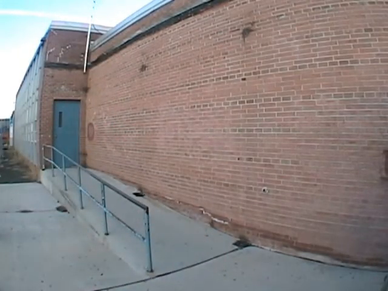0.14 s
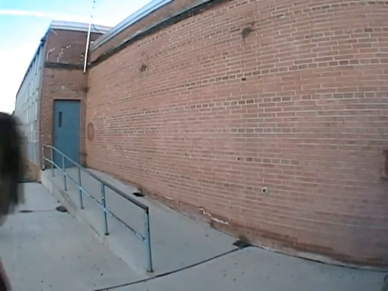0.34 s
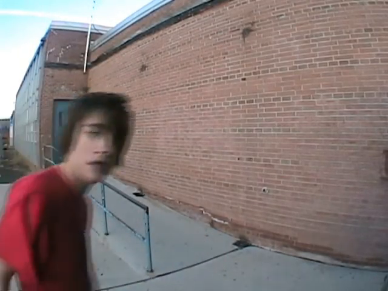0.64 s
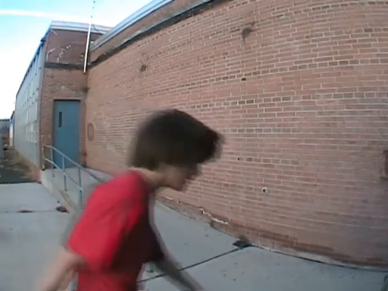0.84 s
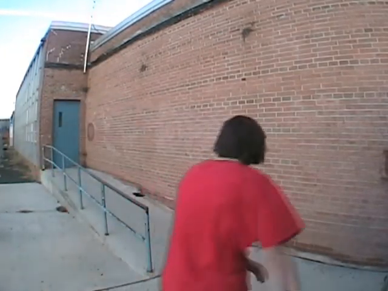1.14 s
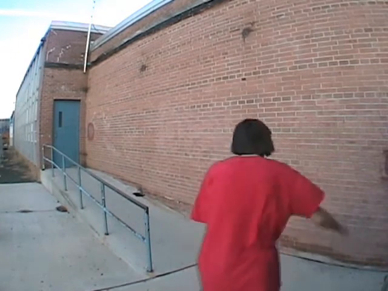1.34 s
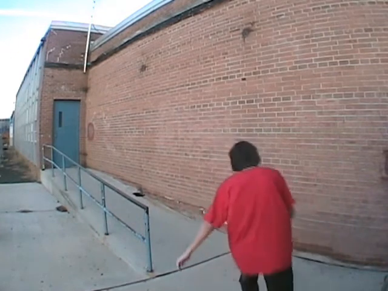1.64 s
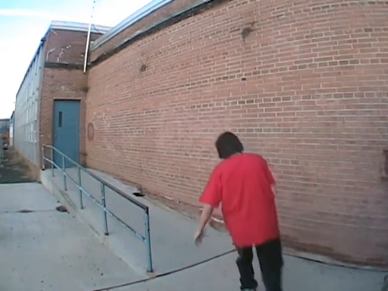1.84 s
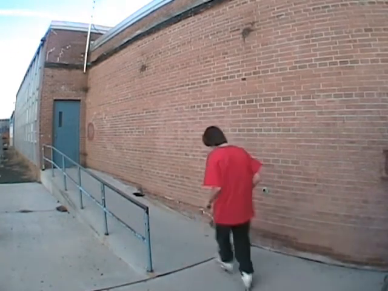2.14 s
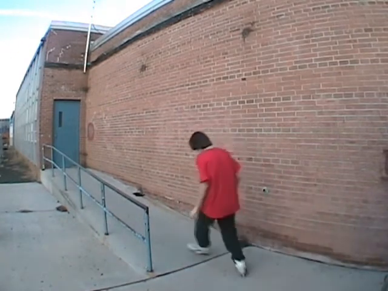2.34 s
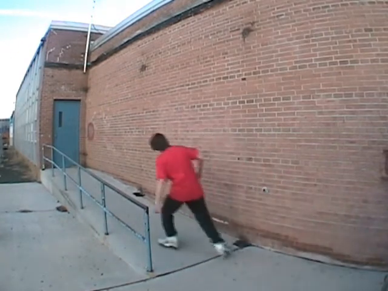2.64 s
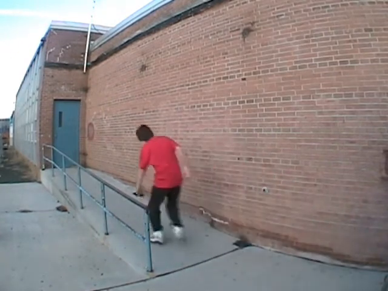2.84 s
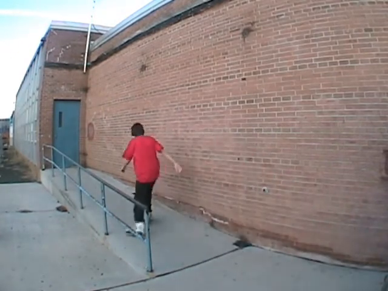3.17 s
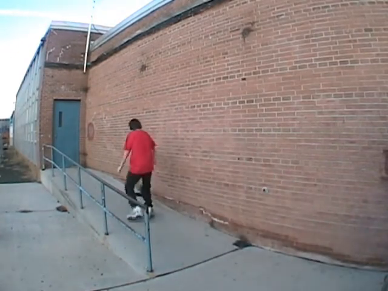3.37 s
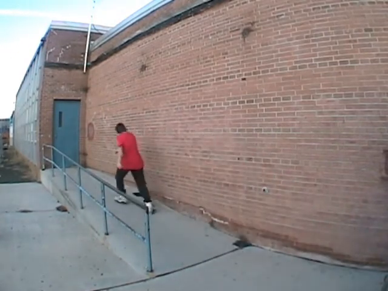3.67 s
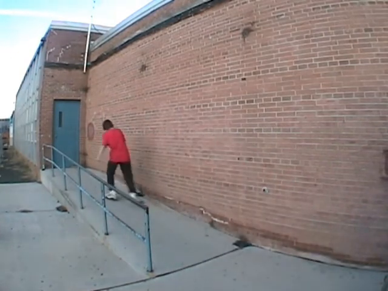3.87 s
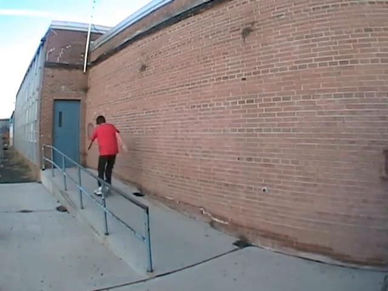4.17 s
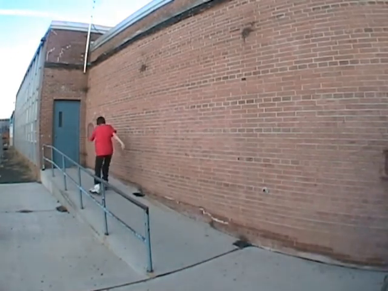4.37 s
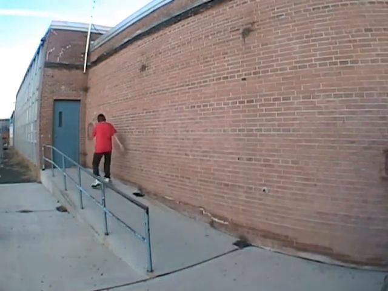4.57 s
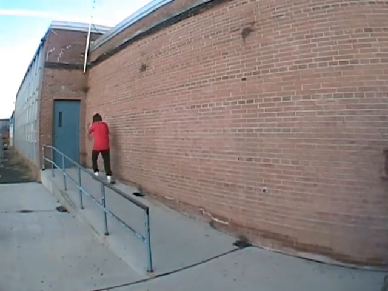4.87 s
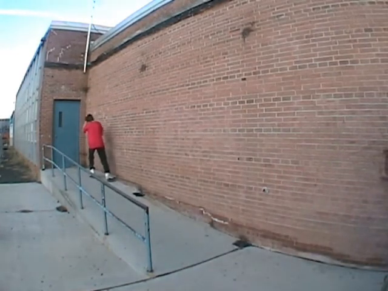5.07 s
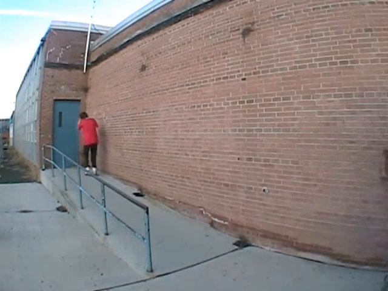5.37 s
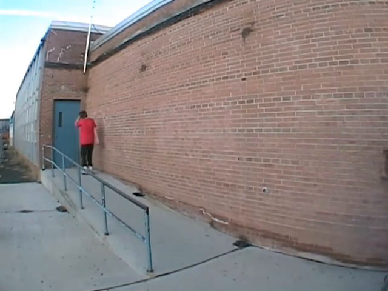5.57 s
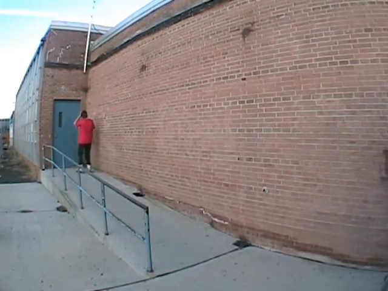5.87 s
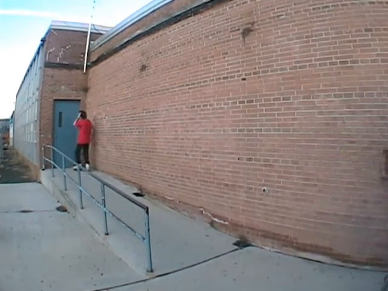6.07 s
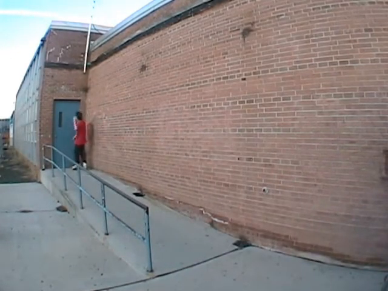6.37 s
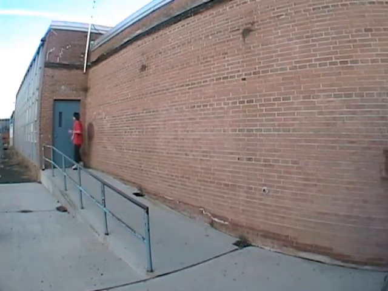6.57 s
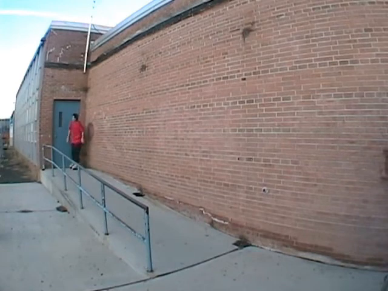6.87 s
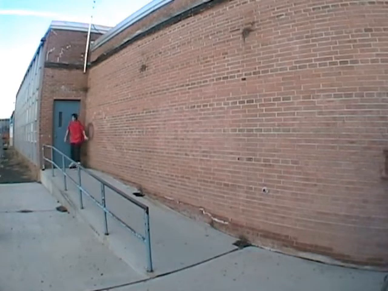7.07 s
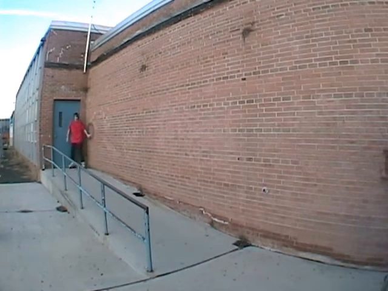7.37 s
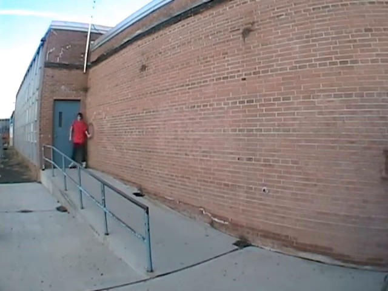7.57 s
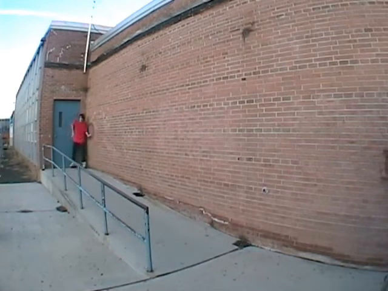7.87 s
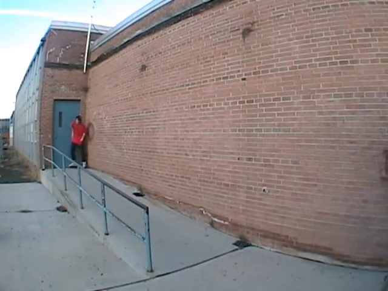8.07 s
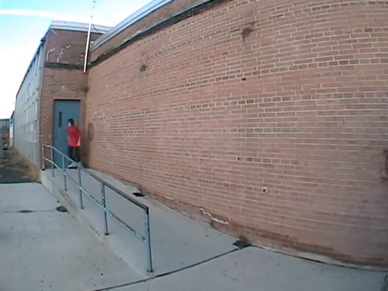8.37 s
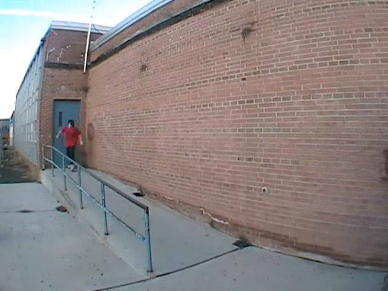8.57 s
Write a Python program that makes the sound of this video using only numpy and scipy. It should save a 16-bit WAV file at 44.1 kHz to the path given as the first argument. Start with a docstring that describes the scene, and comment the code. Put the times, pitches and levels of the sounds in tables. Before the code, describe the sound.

Coasting skate wheels hum past with a brief singing bearing, followed by hard plastic knocks and gritty scrapes receding up a concrete ramp outdoors.

```python
"""Coasting skate wheels hum and whirr past at once, with a bearing singing; then a skater stamps up a concrete ramp.
Each set-down rings boot, wheel, plastic shell and frame through resonators fed by an impact and chattering grains.
Between them the wheels grind: patchy grains drive the same resonances, crushed sand and cracking stones on top.
A brick wall answers by convolution with a slap and decaying noise.
Underneath: shaped-noise rumble and hiss, a low drone, and the faint wavering tones of a camera mechanism."""
import sys
import numpy as np
from scipy import signal
from scipy.fft import rfft, irfft, next_fast_len
from scipy.io import wavfile

SR = 44100
rng = np.random.default_rng(int(sys.argv[2]) if len(sys.argv) > 2 else 0)


def transcribe(u):
    """Save the signal u as a 16-bit wav file named by the first command-line argument.

    u: samples, shape (n,) or (channels, n), limited to [-1, 1]; the rate is SR.
    q: integer samples, one column per channel.
    """
    v = np.clip(np.atleast_2d(u).T, -1, 1)
    q = np.round(v * 32767).astype(np.int16)
    wavfile.write(sys.argv[1], SR, q)


N = 384111


def from_db(db):
    """Decibels to amplitude gain."""
    return 10 ** (np.asarray(db) / 20)


def rms_one(x):
    """Scale to unit rms."""
    return x / np.sqrt(np.mean(x ** 2) + 1e-20)


def in_time(rows):
    """Interpolate each column of a (t/s, ...) table to every sample."""
    s, *columns = np.transpose(rows)
    return [np.interp(np.arange(N) / SR, s, c) for c in columns]


def butter(x, hz, kind, order=2):
    """Causal Butterworth high- or low-pass."""
    sos = signal.butter(order, min(hz, SR / 2 - 2000), kind, fs=SR, output="sos")
    return signal.sosfilt(sos, x)


def band(x, low_hz, high_hz, order=2):
    """High-pass, then low-pass of the given order."""
    return butter(butter(x, low_hz, "high"), high_hz, "low", order=order)


def coloured(x, spectrum):
    """Filter by (f/Hz, gain/dB) points, interpolated over log frequency."""
    hz, db = np.transpose(spectrum)
    size = next_fast_len(N)
    bins = np.maximum(np.fft.rfftfreq(size, 1 / SR), 1)
    gain = from_db(np.interp(np.log(bins), np.log(hz), db))
    return irfft(rfft(x, size) * gain, size)[:N]


def drift(per_s, count=N):
    """Random curve of unit rms with per_s new values a second."""
    i = np.arange(count)
    return rms_one(np.interp(i / SR * per_s, i, rng.standard_normal(count)))


def wavering_sine(hz):
    """Sine of peak sqrt(2), hence unit rms, following a pitch curve."""
    return np.sqrt(2) * np.sin(2 * np.pi * np.cumsum(hz) / SR)


def resonate(x, modes, detune=1, spread_db=0):
    """Parallel two-pole resonances with alternating signs; spread_db varies their strengths."""
    out = 0
    for k, (hz, width_hz, db) in enumerate(modes):
        r = np.exp(-np.pi * width_hz / SR)
        poles = [1, -2 * r * np.cos(2 * np.pi * hz * detune / SR), r * r]
        gain = (-1) ** k * from_db(db + spread_db * rng.standard_normal()) * (1 - r * r) / 2
        out = out + gain * signal.lfilter([1, 0, -1], poles, x + 1e-18)
    return out


def grains(per_s, size_db, count):
    """Random single-sample contacts of either sign, a few much larger than the rest."""
    sizes = from_db(size_db * np.minimum(rng.exponential(1, count), 4))
    return sizes * rng.choice([-1, 1], count) * (rng.random(count) < per_s / SR)


def favour(hz, ring_hz, width):
    """Nearness of a mode to the favoured pitch, 0-1; width in log frequency."""
    return np.exp(-(np.log(hz / ring_hz) / width) ** 2)


# partials of the camera mechanism: f/Hz, level/dB
WHINE_PARTIALS = [(3136, -66), (4931, -70), (5385, -75), (5925, -81), (6180, -71), (6374, -69.5),
                  (7144, -83), (8166, -82)]


def whine():
    """Mechanism whine: sines that waver in pitch and level."""
    out = 0
    for hz, db in WHINE_PARTIALS:
        level = from_db(db + 2 * drift(40))
        out = out + level * wavering_sine(hz + 17 * drift(90))
    return out


# level of the distant drone: t/s, level/dB
DRONE_LEVEL = [(0, -59), (3.4, -49.5), (4.1, -44), (5.2, -44.5), (6.2, -44), (7, -54), (8.7, -45)]
DRONE_HZ, DRONE_WIDTH_HZ = 128.3, 29


def drone():
    """Distant low drone: noise through two equal resonances in series."""
    mode = [(DRONE_HZ, DRONE_WIDTH_HZ, 0)]
    noise = resonate(resonate(rng.standard_normal(N), mode), mode)
    return from_db(in_time(DRONE_LEVEL)[0]) * rms_one(noise)


# relative spectra of distant rumble and of hiss: f/Hz, level/dB
RUMBLE_SPECTRUM = [(15, -73), (25, -24), (60, -8), (119, -1.1), (152, -5), (189, -1.5), (210, -5.5),
                   (234, -3.5), (329, -8), (356, -2.5), (384, -10.5), (492, -12), (583, -15.5), (610, -17),
                   (757, -25), (1000, -17), (1300, -62), (2200, -120)]
HISS_SPECTRUM = [(590, -5), (1000, 0.5), (1180, 1), (1390, -1), (2550, -12), (3190, -13), (4240, -20.5),
                 (5820, -18), (6310, -27), (7130, -25), (8480, -21.5), (10300, -24.5), (11400, -28),
                 (14800, -83), (22000, -120)]
# swell of the rumble: t/s, level/dB
RUMBLE_SWELL = [(0, -2.5), (1, -0.5), (2, 0.5), (3, -1), (4, 0.5), (5, 0), (6, 1.5), (7, 0.5), (8, -0.5),
                (8.7, 1.5)]
RUMBLE_DB, HISS_DB = -38, -47


def air():
    """Wavering rumble plus steady hiss, both shaped noise."""
    rumble = rms_one(coloured(rng.standard_normal(N), RUMBLE_SPECTRUM))
    rumble_db = RUMBLE_DB + in_time(RUMBLE_SWELL)[0] + 1.0 * drift(8.0)
    hiss = rms_one(coloured(rng.standard_normal(N), HISS_SPECTRUM))
    return rumble * from_db(rumble_db) + hiss * from_db(HISS_DB)


# air sound of opposite sign at the two ports, against the shared air: f/Hz, level/dB
UNSHARED_AIR = [(30, -18), (60, -21), (120, -34), (250, -16), (600, -2.5), (1200, -3), (4000, -10),
                (10000, -25)]


def background():
    """Air, whine and drone at both microphone ports; a second air signal enters with opposite signs."""
    unshared = coloured(air(), UNSHARED_AIR) * [[1], [-1]]
    return air() + unshared + whine() + drone()


# drive of the wall reflections: t/s, level/dB
WALL_DRIVE = [(0, -13.5), (2.5, -16.5), (4, -15.5), (6, -13), (8.7, -18)]
YARD_T60_S, TAIL_T60_S = 0.13, 0.5


def yard(x):
    """Wall slap, quick scatter and fainter long tail: convolution with noise partly unique to each port."""
    t = np.arange(SR // 2) / SR
    decay = from_db(-60 * t / YARD_T60_S) + from_db(-6) * from_db(-60 * t / TAIL_T60_S)
    scatter = rng.standard_normal(len(t)) + .7 * rng.standard_normal((2, len(t)))
    response = butter(scatter * decay * (t > .004), 7700, "low", order=1)
    response /= np.sqrt(np.sum(response ** 2) / 2)
    response[:, round(.018 * SR)] += .35   # slap
    response = butter(response, 500, "high", order=1)
    drive = x[None] * from_db(in_time(WALL_DRIVE)[0])
    return signal.fftconvolve(drive, response, axes=1)[:, :N]


# singing bearing: t/s, f/Hz, level/dB
BEARING_SING = [(.44, 3950, -66), (.51, 3990, -46.5), (.58, 4040, -46), (.66, 3950, -49.5),
                (.73, 3860, -53), (.83, 3760, -72)]
SING_WIDTH_HZ = 150


def bearing():
    """Bearing swish that bends up and sinks again: a gliding sine multiplied by low-passed noise."""
    hz, db = in_time(BEARING_SING)
    flutter = rms_one(butter(rng.standard_normal(N), SING_WIDTH_HZ / 2, "low"))
    return from_db(db) * flutter * wavering_sine(hz)


# resonances of coasting wheels and spinning bearings: f/Hz, width/Hz, level/dB
COASTING_MODES = [(240, 120, -3), (341, 33, 1), (390, 33, 6), (544, 130, 2), (913, 140, -1),
                  (1440, 200, -1), (1780, 190, -3), (2200, 580, -8.5)]
BEARING_MODES = [(2960, 1130, 7.5), (3770, 310, 11), (4860, 3500, -4.5), (6500, 530, -0.5),
                 (8800, 2000, -11)]
# relative spectrum of crushed sand: f/Hz, level/dB
GRIT_SPECTRUM = [(500, -11), (900, 12), (2400, 3), (3200, -2), (4700, -2), (6000, -8), (7500, -7.5),
                 (9200, -6), (11000, -29)]
PASS_S, PASS_DISTANCE_M, SPEED_M_PER_S = 0.55, 0.28, 2.26
LIFT_S, LIFT_FADE_S = 0.83, 0.1   # the coasting skate leaves the ground
HUM_DB, WHIRR_DB, GLIDE_GRIT_DB = -32.5, -41.5, -45.5   # at the closest point
WHEEL_TONE_HZ, WHEEL_TONE_DB = 403.4, -43.5


def glide():
    """Coasting: grains ring wheels and bearings with 1/distance gain; tone and swish join in until the lift."""
    t = np.arange(N) / SR
    nearness = PASS_DISTANCE_M / np.hypot(PASS_DISTANCE_M, SPEED_M_PER_S * (t - PASS_S))
    grounded = np.clip(1 - (t - LIFT_S) / LIFT_FADE_S, 0, 1)
    ground = grains(per_s=9000, size_db=3.5, count=N) * from_db(0.12 * drift(35))
    hum = from_db(HUM_DB) * rms_one(resonate(ground, COASTING_MODES))
    whirr = from_db(WHIRR_DB) * rms_one(resonate(ground, BEARING_MODES))
    stray = grains(per_s=260, size_db=3.0, count=N)
    grit = from_db(GLIDE_GRIT_DB) * rms_one(coloured(stray, GRIT_SPECTRUM))
    tone_gain = from_db(WHEEL_TONE_DB + 2 * drift(18))
    tone = tone_gain * wavering_sine(WHEEL_TONE_HZ + 3 * drift(25))
    return grounded * (nearness * (hum + whirr + grit) + tone + bearing())


# resonances of the boot: f/Hz, width/Hz, level/dB
BOOT_MODES = [(234.6, 130, -3.5), (306, 113, 2.5), (405, 110, -5.5)]
# skate rolling or shuffling on concrete: start t/s, length/s,
# grinding level/dB, rumble level/dB (before BOOT_TRIM_DB), grit level/dB, rumble f/Hz
ROLLING_STROKES = [(0.92, 0.6, -40, -35, -43.5, 382), (1.607, 0.61, -34, -31.5, -40.5, 280),
                   (1.665, .09, -46, -28, -41.5, 300), (2.1, 0.21, -39.5, -37, -38.5, 300),
                   (2.298, 0.45, -40, -37.5, -39.5, 374), (2.736, 0.42, -46.5, -42.5, -57, 333),
                   (3.123, 0.15, -45, -34.5, -43, 302), (3.315, 0.69, -45.5, -40, -51, 342),
                   (3.954, .48, -49.5, -44, -54.5, 332), (4.42, 0.43, -52, -62, -54, 330),
                   (4.778, 0.2, -43, -66, -54.5, 330), (4.974, 0.17, -39.5, -43, -48, 330),
                   (5.2, 0.43, -53.5, -60, -55.5, 330), (5.51, 0.31, -45, -50, -52, 330),
                   (5.513, 0.043, -40, -38, -46, 400), (5.81, 0.2, -41, -46, -55, 356),
                   (6.07, 0.56, -47.5, -53, -56, 330), (6.422, 0.11, -46, -48, -48, 250),
                   (6.65, 0.71, -51.5, -48, -77, 300), (7.583, .062, -54, -61, -53, 330),
                   (7.805, .055, -47, -59, -49.5, 330), (8.305, .029, -46, -33.5, -56, 264)]
STROKE_ATTACK_S, STROKE_RELEASE_S, STROKE_SAG_DB_PER_S = 0.04, 0.049, 2.5
RUMBLE_RING_DB = 6   # how far a stroke favours boot modes near its pitch


def stroke_gains():
    """Strokes take weight, sag as the skate slows and die away; power-summed gains: grind, grit, boot modes."""
    power = np.zeros((2 + len(BOOT_MODES), N))
    boot_hz = np.array(BOOT_MODES)[:, 0]
    for start_s, length_s, grind_db, rumble_db, grit_db, rumble_hz in ROLLING_STROKES:
        at = round(start_s * SR)
        t = np.arange(min(SR, N - at)) / SR
        attack = np.minimum(t / STROKE_ATTACK_S, 1)
        release = np.exp(-np.maximum(t - length_s, 0) / STROKE_RELEASE_S)
        shape = attack * from_db(-STROKE_SAG_DB_PER_S * t) * release
        shares = from_db(RUMBLE_RING_DB * favour(boot_hz, rumble_hz, width=0.22))
        boot_gains = from_db(rumble_db) * shares / np.linalg.norm(shares)
        gains = [from_db(grind_db), from_db(grit_db), *boot_gains]
        power[:, at:at + len(t)] += np.outer(gains, shape) ** 2
    return np.sqrt(power)


# resonances of the shell and of a struck wheel: f/Hz, width/Hz, level/dB
SHELL_MODES = [(950, 46, -33), (1066, 70, -1.5), (1290, 225, 1), (1554, 226, 2), (1716, 257, 1.5),
               (1990, 367, 2.5), (2164, 240, 1.5), (2870, 28, -21)]
WHEEL_MODES = [(483, 165, -9), (602, 39, 2), (860, 123, -4)]
SNAPS_PER_S, SNAP_SHARE = 400, 0.68   # breaking bits of grit; strength against sand
STONE_WIDTH_SHARE = .35   # ring width / pitch
LEAN_DB, LEAN_PER_S = 1.3, 14   # as the skate leans, each shell mode comes and goes
BOOT_TRIM_DB, WHEEL_SHARE_DB = 1.0, -21


def grit_snaps():
    """Bits of grit snap: sparse grains ring eight broad resonances."""
    pitches_hz = np.geomspace(1900, 8000, 8)
    out = 0
    for hz in pitches_hz:
        bits = grains(per_s=SNAPS_PER_S / len(pitches_hz), size_db=3.0, count=N)
        out = out + resonate(bits, [(hz, STONE_WIDTH_SHARE * hz, 0)]) / np.sqrt(hz)
    return rms_one(out)


def rolling():
    """Concrete grain drums unevenly on the wheels, exciting boot, wheel and shell; sand crackles, grit snaps."""
    grind_gain, grit_gain, *boot_gains = stroke_gains()
    # smooth rolling turns to jerky shuffling
    jerk_db = np.interp(np.arange(N) / SR, [2.8, 4.5], [2.2, 2.9])
    patches = from_db(jerk_db * np.minimum(drift(220), 1.6))
    ground = rms_one(grains(per_s=6000, size_db=2.0, count=N) * patches)
    sand = rms_one(grains(per_s=5000, size_db=3.0, count=N) * patches)
    boot = 0
    for k, (mode, gain) in enumerate(zip(BOOT_MODES, boot_gains)):
        boot = boot + (-1) ** k * gain * rms_one(resonate(ground, [mode]))
    wheel_gain = from_db(WHEEL_SHARE_DB) * np.linalg.norm(boot_gains, axis=0)
    wheel = wheel_gain * rms_one(resonate(ground, WHEEL_MODES))
    grind = 0
    for k, mode in enumerate(SHELL_MODES):
        lean = from_db(LEAN_DB * drift(LEAN_PER_S))
        grind = grind + (-1) ** k * lean * resonate(ground, [mode])
    grit = rms_one(coloured(sand + SNAP_SHARE * grit_snaps(), GRIT_SPECTRUM))
    return from_db(BOOT_TRIM_DB) * boot + wheel + grind_gain * rms_one(grind) + grit_gain * grit


# single stones cracking under a wheel: t/s, level/dB (rms of first 1/700 s), f/Hz
STONE_CRACKS = [(1.0677, -39, 4080), (1.1274, -49, 3750), (1.156, -41, 3640), (1.1837, -42, 4890),
                (1.2221, -43, 3680), (1.2612, -34.5, 4700), (1.488, -37, 4600), (1.4987, -44, 4480),
                (1.6053, -44, 3990), (1.6771, -39, 3920), (1.8076, -35.5, 3660), (1.834, -37, 4050),
                (1.9054, -38, 3640), (1.953, -44, 4180), (2.115, -24, 4110), (2.348, -39, 4550),
                (2.687, -38, 3560), (2.713, -34, 3910), (2.803, -38.5, 3400), (3.053, -41, 3470),
                (3.1847, -39, 4660), (3.231, -41, 4800), (3.684, -43, 3430), (3.8306, -39, 3650),
                (3.925, -41, 3520), (4.882, -45, 6500), (4.947, -42, 3460), (5.1014, -46, 4900),
                (5.1078, -43, 4600), (5.5428, -45, 4600), (5.6346, -43, 4500), (6.514, -43, 4880),
                (7.224, -39, 4520), (7.633, -42, 4930), (7.76, -46, 3420), (8.1628, -28, 3080)]
STONE_CRUMBLE_S = .0009   # decay time constant of the burst


def stones():
    """A stone bursts under a wheel: decaying noise rings one broad resonance and the shell."""
    t = np.arange(SR // 40) / SR
    out = np.zeros(N + len(t))
    for s, db, hz in STONE_CRACKS:
        burst = rng.standard_normal(len(t)) * np.exp(-t / STONE_CRUMBLE_S)
        tick = resonate(burst, [(hz, STONE_WIDTH_SHARE * hz, 0)])
        tick = tick + 0.11 * band(burst, 2300, 8700) + 0.98 * resonate(burst, SHELL_MODES)
        at = round(s * SR)
        out[at:at + len(t)] += from_db(db) * tick / np.sqrt(np.mean(tick[:SR // 700] ** 2))
    return out[:N]


# resonances of the frame that holds the wheels: f/Hz, width/Hz, level/dB
FRAME_MODES = [(2846, 276, 6.5), (3650, 460, 3), (4050, 230, -3.5), (4530, 240, 5), (4900, 1400, -1),
               (5730, 410, -6), (5850, 2500, -18.5), (6570, 490, -4), (7600, 1700, -6.5),
               (8600, 5400, -10.5)]
# lower and upper edge of the thump, as ratios to its pitch
THUMP_EDGES = (.62, 1.45)
# set-downs: t/s, boot thump level/dB, shell clack level/dB, frame tick level/dB (rms of first 20 ms),
# thump f/Hz, favoured shell ring f/Hz, tick tilt/(dB/octave), scuff/s
SET_DOWNS = [(.039, -45, -35.5, -42, 330, 2200, -4, 0.012),
             (.269, -46, -35.5, -37.5, 330, 1290, -10, .0018), (.297, -48, -39, -43, 330, 1500, -14, .005),
             (.903, -36, -23.5, -35.5, 366, 1670, 4, 0.0011), (.908, -38, -32, -50, 370, 1660, -4, 0.00098),
             (.920, -30, -38, -41, 373, 1780, 0, .0014), (.952, -20.5, -23.5, -31, 322, 1400, 0.5, 0.0024),
             (.963, -44, -46, -38, 312, 2000, 3, 0.0025), (1.431, -60, -38.5, -42.5, 330, 1610, 4, .00086),
             (1.574, -40, -35.5, -42, 375, 1330, -3, 0.013), (1.643, -26, -47, -41, 320, 1310, 0, 0.0052),
             (2.087, -28, -22, -32, 302, 1970, 3, .002), (2.094, -28, -28, -32, 297, 2200, 1, 0.003),
             (2.102, -11.5, -18, -20, 292, 1270, 3, 0.0019),
             (2.109, -28, -16.5, -26, 386, 1980, -12, 0.0023), (2.115, -34, -29, -33, 330, 1300, 8, .001),
             (2.147, -35, -34, -46, 290, 1300, -7, .002), (2.189, -33, -31, -45, 373, 2000, -13, 0.0016),
             (2.558, -33.5, -27, -44, 377, 2200, 5, 0.0036),
             (2.633, -16.5, -21.5, -35.5, 331, 1950, 8, .0022),
             (3.207, -28, -30, -38, 287, 1440, -7, .0035),
             (3.214, -23.5, -23.5, -39, 258, 1390, -1, 0.0034), (3.226, -38, -38, -40, 343, 1780, 2, .004),
             (3.243, -39, -36, -49, 267, 1500, -10, 0.0063),
             (3.491, -37, -32.5, -37, 408, 1580, 6.5, .0048),
             (3.558, -35.5, -30.5, -43, 364, 1450, 5.5, 0.003),
             (3.790, -28, -28, -57, 356, 1570, -6, .0009), (3.797, -45, -34, -46, 350, 1850, 14, 0.0048),
             (3.806, -22, -28, -35.5, 365, 1780, -3, .0026), (3.832, -38, -38, -46, 296, 2020, -18, .0042),
             (4.457, -27.5, -25, -36, 410, 1780, -3, 0.0054),
             (4.476, -40, -32.5, -40, 312, 1330, -5, .0052), (4.719, -37.5, -35, -37, 408, 1500, 1, .0026),
             (4.739, -54, -39, -43, 370, 1760, 5, .0066), (4.820, -38.5, -33, -46, 360, 1570, 10, 0.0029),
             (4.838, -53, -51, -59, 335, 1540, 0, .0016), (5.003, -35, -37.5, -55, 230, 2010, -4, 0.0029),
             (5.021, -42, -41, -56, 330, 1990, -6, 0.0028), (5.038, -36, -49, -55, 405, 1500, -6, .0027),
             (5.087, -56, -44, -49.5, 290, 2140, 20, .0011), (5.123, -46, -37, -45, 240, 1970, -5, 0.0038),
             (5.156, -60, -49, -53, 330, 2140, 0, .0015), (5.185, -41, -29.5, -42, 271, 1410, 4, 0.0036),
             (5.296, -36, -37.5, -47.5, 288, 1440, -7, 0.0029),
             (5.410, -52, -33, -52, 420, 1380, 21, 0.0039), (5.420, -55, -35, -47, 322, 1370, -5, .0025),
             (5.431, -52, -39, -44, 270, 2030, -7, 0.0039), (5.494, -38, -24.5, -44, 315, 2040, 8, 0.0023),
             (5.500, -43, -27, -36.5, 315, 1900, -11, 0.0023),
             (5.508, -46, -29.5, -40, 285, 1690, -16, .0018),
             (5.513, -38.5, -29.5, -42, 288, 2070, -8, 0.0015),
             (5.559, -44, -32, -57, 365, 2040, -2, 0.0044), (5.570, -37, -37, -53, 417, 1780, -8, 0.002),
             (5.771, -37, -35, -41, 310, 2120, -17, 0.0036),
             (5.916, -44, -37.5, -49, 358, 1960, -16, 0.0033),
             (6.375, -33, -38.5, -48, 246, 1640, -6, 0.0061), (6.483, -49, -35, -53, 300, 1660, -5, .0025),
             (6.549, -38, -40.5, -53, 334, 1360, -5, 0.0018),
             (6.564, -58, -34.5, -44.5, 300, 1350, -4, 0.0027),
             (6.584, -53, -40, -52, 297, 2200, -3, 0.0037), (6.594, -41, -44, -55, 320, 1500, -8, 0.0023),
             (6.923, -36, -28, -41, 260, 1890, -2, 0.0022),
             (7.033, -56, -39.5, -46.5, 255, 1290, 11, 0.003), (7.111, -63, -46, -51.5, 230, 1800, 7, .004),
             (7.200, -51, -32.5, -36, 262, 1290, 11, 0.0028),
             (7.218, -49, -38, -42.5, 278, 1560, -17, 0.0083),
             (7.243, -48, -49, -48, 328, 1500, 17, 0.0048), (7.277, -60, -55, -48, 370, 1400, 29, 0.0033),
             (7.293, -52, -42, -62, 380, 1440, 0, .0026), (7.309, -47, -44, -44, 260, 1900, 9.5, .0042),
             (7.509, -31, -34.5, -45, 325, 1330, -1, 0.0042),
             (7.578, -38.5, -48, -44, 355, 1370, -12, 0.0033),
             (8.161, -43, -41.5, -45, 267, 1090, 5, 0.00068),
             (8.314, -35, -28, -41.5, 363, 1290, -10, 0.0027),
             (8.698, -30.5, -23.5, -40, 420, 1920, 2, 0.007)]
WHEEL_GIVE_S, BOTTOMING_S = 0.001602, 0.001   # wheel squash before the frame's blow; spread of that blow
WEIGHT_SETTLES_S = .005   # the boot takes up the weight
RAGGED_DB, RAGGED_PER_S = 4, 600   # unevenness of the chatter
SHELL_VARIES = .03   # relative spread of each shell mode's pitch between landings
RING_DB = 7   # how far a landing favours shell modes near its ring
BOOT_GIVES_DB, BOOT_DAMPING_OCT_PER_DB = -21, .035   # heavier thumps widen the boot modes
WHEEL_KNOCK_DB = -8.5   # against the weaker of thump and clack


def landing_forces(t, scuff_s):
    """Wheels land, squash and chatter down: chatter, force on shell, weight on boot, blow on frame."""
    impact = (t == 0) * 1.0
    settling = np.exp(-t / (2.5 * scuff_s)) + from_db(-19.0) * np.exp(-t / 0.018)   # slides on a little
    ragged = from_db(RAGGED_DB * drift(RAGGED_PER_S, count=len(t)))
    contact = (1 - np.exp(-t / (0.13 * scuff_s))) * settling * ragged
    chatter = grains(per_s=6700, size_db=1.0, count=len(t)) * contact
    chatter = rms_one(chatter) / np.sqrt(len(t))
    square = np.exp(-scuff_s / 0.0052)   # a glancing landing has little first impact
    bottoming = rng.standard_normal(len(t)) * np.exp(-((t - WHEEL_GIVE_S) / BOTTOMING_S) ** 2)
    bottoming = rms_one(bottoming) / np.sqrt(len(t))
    force = chatter + 1.31 * square * np.roll(impact, round(WHEEL_GIVE_S / 2 * SR))
    weight = chatter * np.exp(-t / WEIGHT_SETTLES_S) + 1.6 * square * impact
    blow = chatter + 1.06 * square * bottoming
    return chatter, force, weight, blow


def landing_modes(thump_db, thump_hz, ring_hz, tilt_db):
    """Boot, shell and frame modes: load damps the boot, the struck spot favours shell modes, tilt the frame's."""
    shell = []
    for hz, width_hz, db in SHELL_MODES:
        strayed_hz = hz * (1 + SHELL_VARIES * rng.standard_normal())
        shell.append((strayed_hz, width_hz, db + RING_DB * favour(hz, ring_hz, width=.09)))
    frame = [(hz, width_hz, db + tilt_db * np.log2(hz / FRAME_MODES[0][0]))
             for hz, width_hz, db in FRAME_MODES]
    load_db = max(thump_db - BOOT_GIVES_DB, 0)
    widening = 2 ** (BOOT_DAMPING_OCT_PER_DB * load_db)
    boot = [(hz * thump_hz / BOOT_MODES[1][0], width_hz * widening, db)
            for hz, width_hz, db in BOOT_MODES]
    return boot, shell, frame


def knocks():
    """Set-downs: landing forces ring boot, wheel, shell and frame; scrape and crack add filtered contact noise."""
    t = np.arange(SR // 6) / SR
    attack = SR // 50
    out = np.zeros(N + len(t))
    for s, thump_db, clack_db, tick_db, thump_hz, ring_hz, tilt_db, scuff_s in SET_DOWNS:
        chatter, force, weight, blow = landing_forces(t, scuff_s)
        detune = 1 + .015 * rng.standard_normal()   # each landing loads the skate differently
        boot, shell, frame = landing_modes(thump_db, thump_hz, ring_hz, tilt_db)
        low_hz, high_hz = THUMP_EDGES[0] * thump_hz, THUMP_EDGES[1] * thump_hz
        thump = band(resonate(weight, boot, spread_db=3.5), low_hz, high_hz)
        knock = butter(resonate(weight, WHEEL_MODES, detune, spread_db=3.0), 2050, "low")
        scrape = band(np.roll(chatter, SR // 1000), 1100, 2300, order=6)
        clack = butter(resonate(force, shell, detune, spread_db=1.5), 4200, "low") + .55 * scrape
        crack = band(np.roll(blow, SR // 2000), 2300, 4500 * 2 ** (max(tilt_db, 0) / 20))
        tick = resonate(blow, frame, detune, spread_db=1.5) + from_db(-9 + tilt_db / 2) * crack
        # only a landing both heavy and hard knocks the wheel
        knock_db = min(thump_db, clack_db) + WHEEL_KNOCK_DB
        at = round(s * SR)
        for part, db in ((thump, thump_db), (knock, knock_db), (clack, clack_db), (tick, tick_db)):
            out[at:at + len(t)] += from_db(db) * part / np.sqrt(np.mean(part[:attack] ** 2))
    return out[:N]


# colour of the left port against the right: f/Hz, level/dB
LEFT_COLOUR = [(30, 6.5), (70, 3.1), (130, 2), (250, -1.4), (1000, 1), (2000, -0.5), (4000, -0.1),
               (8000, 0.5)]
PORT_LAG_SAMPLES = 1.663
PORT_TURN_HZ = 72.4   # below this the left port turns towards antiphase


def scene():
    """Skates, wall and background; skates a little to the right, so left is late, softer, its bass phase-turned."""
    skates = knocks() + stones() + rolling() + glide()
    left, right = skates + yard(skates) + background()
    size = next_fast_len(N + SR // 10)
    hz = np.fft.rfftfreq(size, 1 / SR)
    phase = 2 * np.arctan2(PORT_TURN_HZ, hz) - 2 * np.pi * hz / SR * PORT_LAG_SAMPLES
    left = irfft(rfft(coloured(left, LEFT_COLOUR), size) * np.exp(1j * phase), size)[:N]
    return np.array([left, right]) * from_db([[-.5], [.5]])


CUTOFF_HZ = 11500


def record(dry):
    """Peaks beyond full scale clip; a steep elliptic low-pass cuts the top."""
    sos = signal.ellip(8, .3, 70, CUTOFF_HZ, fs=SR, output="sos")
    return signal.sosfilt(sos, np.clip(dry, -1, 1))


dry = scene()
out = record(dry)
transcribe(out)
```